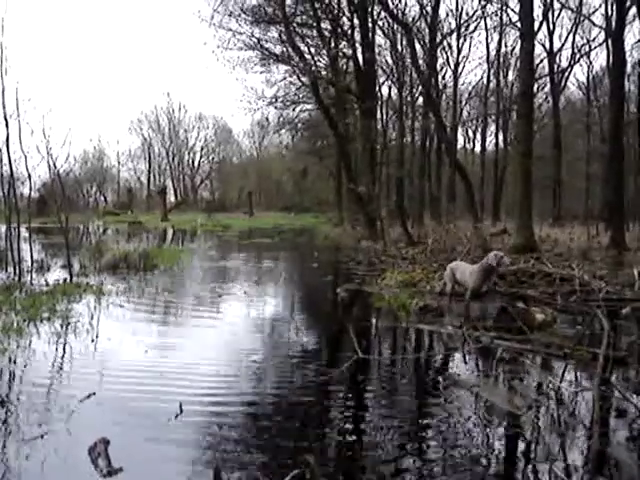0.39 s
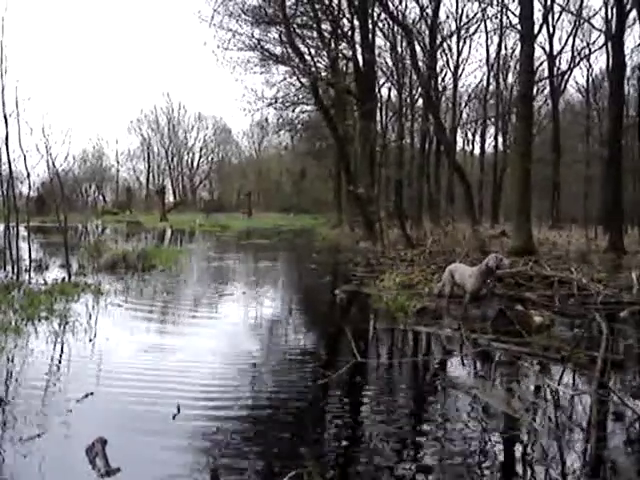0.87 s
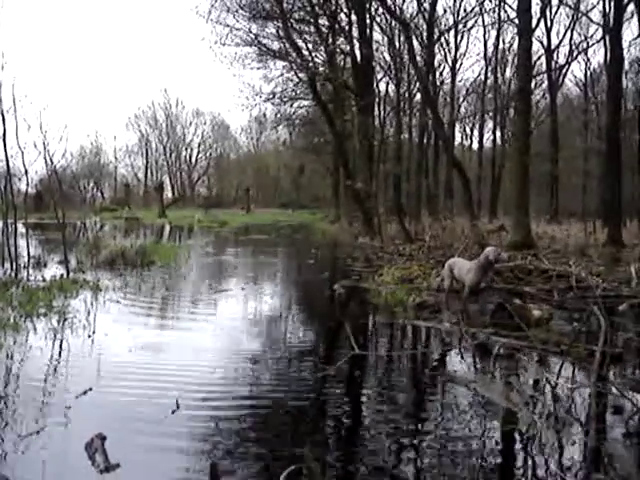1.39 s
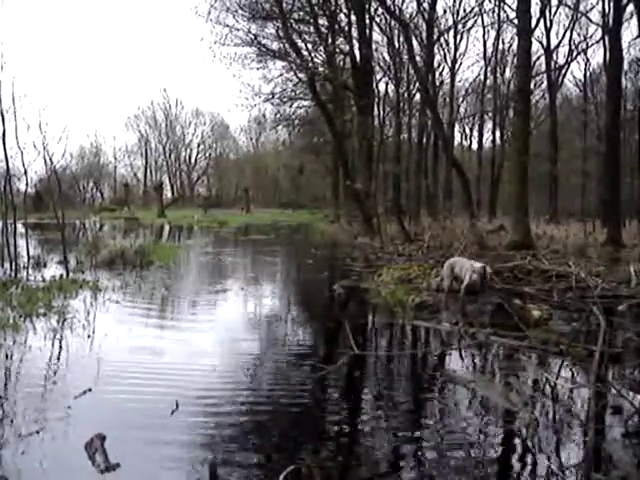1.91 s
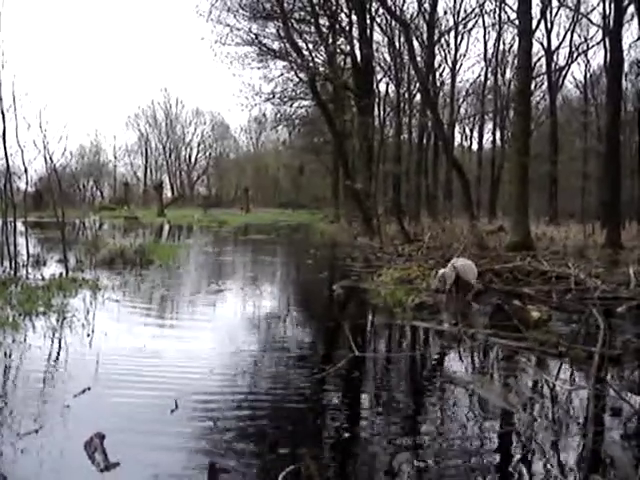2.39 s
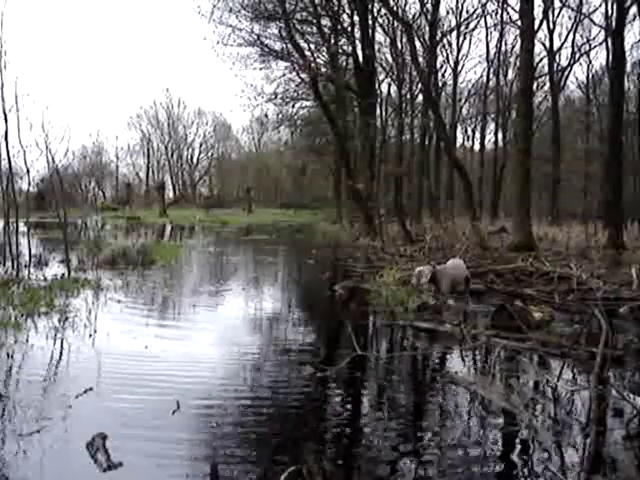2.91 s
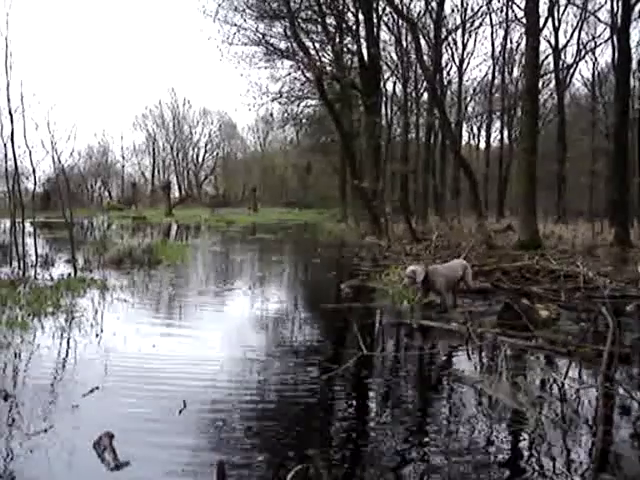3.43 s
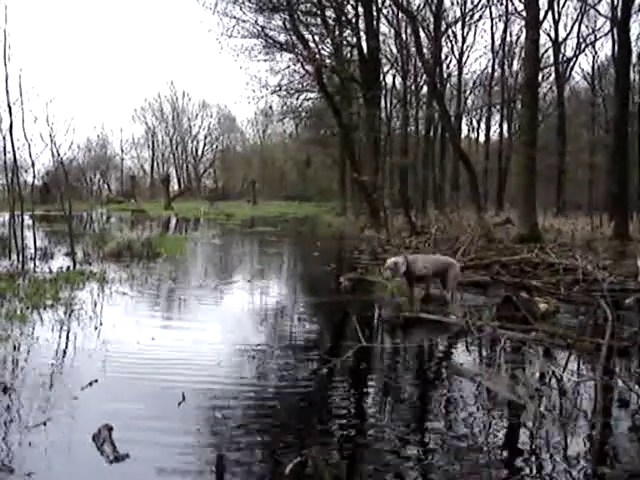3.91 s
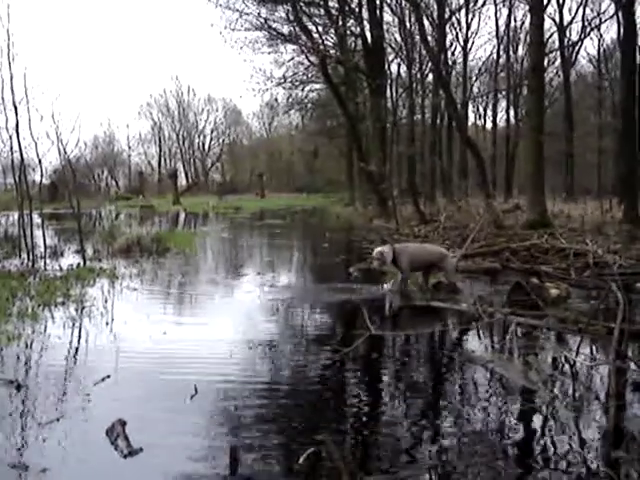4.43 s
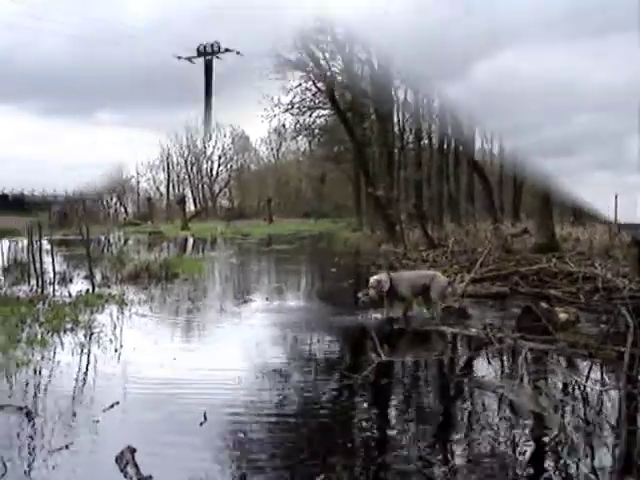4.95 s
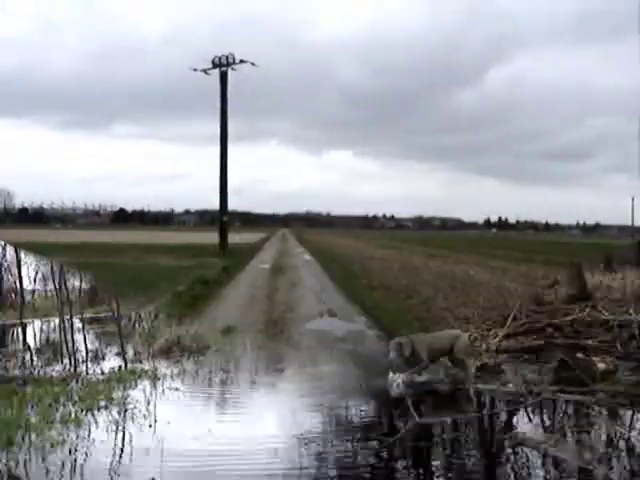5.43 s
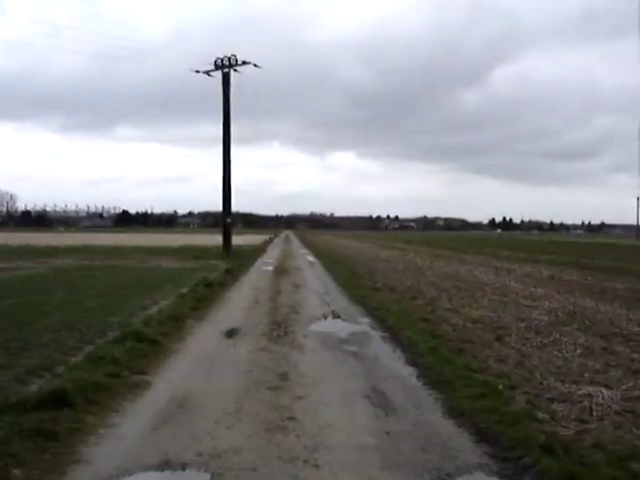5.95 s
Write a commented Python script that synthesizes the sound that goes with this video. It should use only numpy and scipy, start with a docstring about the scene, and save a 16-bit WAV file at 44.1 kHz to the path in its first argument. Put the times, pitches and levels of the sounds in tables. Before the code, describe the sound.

A quiet woodland pond with soft low air and distant traffic. A small bird repeats short high phrases with light echo among trunks. After a couple of tiny ticks and a pause, a dog steps through branches and shallow water: dry snaps, hollow knocks, bubbly plops, fizzing litter. Near the end, gusts strike the bare camera microphone, growing into heavy, distorted buffeting that buries the wood.

```python
"""A woodland pond: a dog steps through branches into the water. Twigs are noise bursts, plops are short
rising sines, the fizz is swarms of filtered specks. Birds are gliding sines, with echoes among the trunks
as a noise tail; far traffic and air in the crowns are bands of noise. Late on the wood sinks away and
gusts beat on the bare microphone as single eddies over filtered noise."""
import sys
import numpy as np
from scipy import signal
from scipy.io import wavfile
from scipy.ndimage import uniform_filter1d

SR = 44100
rng = np.random.default_rng(int(sys.argv[2]) if len(sys.argv) > 2 else 0)


def bounce(signal):
    """Save signal as a 16-bit WAV file at the path given by the first command-line argument."""
    frames = np.transpose(np.atleast_2d(signal))
    limited = np.clip(frames, -1, 1)
    pcm = np.round(limited * 32767).astype(np.int16)
    wavfile.write(sys.argv[1], SR, pcm)


def makeup_ratio(level_db):
    """Linear amplitude ratio for a level in decibels (20 dB per factor of ten)."""
    decades = np.asarray(level_db, float) / 20
    return 10 ** decades


N = 268128
T = np.arange(N) / SR
# Gain of the wood and of the steady drip as they sink away. Each row: time in seconds, gain in dB.
WOOD_FADE = [(0, -1), (4.8, -1), (5.4, 2), (5.8, -6.5), (5.95, -7.5), (6.08, -10)]


def curve(rows):
    """Columns of a table, joined by straight lines in time."""
    s, *columns = np.transpose(rows)
    return [np.interp(T, s, c) for c in columns]


def band(x, hz, octaves):
    """Two-pole-pair band-pass around hz."""
    edges = np.clip([hz * 2 ** (-octaves / 2), hz * 2 ** (octaves / 2)], 10, .45 * SR)
    return signal.sosfilt(signal.butter(2, edges, "bandpass", fs=SR, output="sos"), x)


def unit(x):
    """Scale to rms 1."""
    return x / np.sqrt(np.mean(x ** 2))


def walk(rate_hz):
    """Random levels held 1 / rate_hz seconds and slewed twice; rms near 1."""
    k = int(SR / rate_hz)
    steps = np.repeat(rng.standard_normal(N // k + 1), k)
    return unit(uniform_filter1d(uniform_filter1d(steps, k), k)[:N])


def specks(rate_hz, spread_db):
    """Random impulses of either sign, many small and a few large."""
    hits = rng.random(N) < rate_hz / SR
    sizes = makeup_ratio(spread_db * np.minimum(rng.exponential(size=N), 3))
    return hits * rng.choice([-1, 1], N) * sizes


def add(out, s, sound):
    """Mix a short sound in at time s."""
    i = max(int(s * SR), 0)
    out[i:i + len(sound)] += sound[:N - i]


def woods():
    """Far traffic and air in the crowns: half-octave noise bands that drift a little, plus a camera whine."""
    # Background spectrum. Each row: frequency in Hz, relative density in dB per Hz.
    wood_spectrum = [(20, 3.5), (48, 1.5), (100, -1.5), (350, -0.5), (600, 0.5), (890, -1), (1300, -9.5),
                     (1890, -21), (3190, -22), (4130, -16), (5500, -18), (6950, -22.5), (10000, -27)]
    level_db, whine_hz, whine_db = -44.5, 7690, -70  # rms levels ahead of the fade
    out, swell = 0, walk(1.0)
    hz_at, db_at = np.transpose(wood_spectrum)
    for hz in 28 * 2 ** np.arange(0, 8.6, .5):
        db = np.interp(np.log(hz), np.log(hz_at), db_at) + 10 * np.log10(hz)
        db = db + 0.48 * swell + 0.55 * walk(9)
        out = out + makeup_ratio(db) * unit(band(rng.standard_normal(N), hz, 0.44))
    whine = makeup_ratio(whine_db) * unit(band(rng.standard_normal(N), whine_hz, 0.02))
    return (makeup_ratio(level_db) * unit(out) + whine) * makeup_ratio(curve(WOOD_FADE)[0])


def swish(spray_share):
    """Level in dB of all leg moves over a steady drip: quick rise, hold, dripping tail."""
    # Moves of a leg through water and litter.
    # Each row: start in seconds, length in seconds, relative level in dB, spray in dB above that level.
    leg_moves = [(-.02, 0.076, -49, -15), (2.596, 0.084, -49.5, -21), (2.769, 0.077, -45.5, -8.5),
                 (2.85, .14, -44.5, -14), (3.054, 0.062, -48.5, -15), (3.232, 0.11, -50.5, -9.5),
                 (3.384, 0.019, -50.5, -5), (3.728, 0.036, -51, -5.5), (3.82, 0.13, -55, -11),
                 (3.914, .13, -45, -21), (4.1, 0.039, -45.5, -22), (4.202, 0.036, -44, -3.5),
                 (4.252, 0.23, -42, -13), (4.495, 0.27, -44.5, -9), (4.799, 0.17, -44.5, -14),
                 (5.069, 0.075, -39.5, -14), (5.211, .075, -44, -12.5), (5.479, 0.072, -48.5, -2),
                 (5.66, 0.15, -55, -9)]
    attack_s, t60_s, drip_db, drip_spray_db = .008, 0.35, -61.5, -4
    t = T[::64]
    power = makeup_ratio(2 * (drip_db + spray_share * drip_spray_db)) * makeup_ratio(2 * curve(WOOD_FADE)[0][::64])
    for s, length_s, db, spray_db in leg_moves:
        rise = np.clip((t - s) / attack_s, 0, 1)
        shape = rise * 1000. ** (-np.maximum(t - s - length_s, 0) / t60_s)
        power = power + (makeup_ratio(db + spray_share * spray_db) * shape) ** 2
    return np.interp(T, t, 10 * np.log10(power))


def stir():
    """Swarms of tiny bubbles and leaf ticks; each grain size rings its own narrow band, in patches."""
    out, shared = 0, walk(70)
    for hz in 600 * 2 ** np.arange(0, 4.1, 1 / 3):
        ticks = unit(band(specks(500, 6.1), hz, 0.33))
        grains = ticks + 0.85 * unit(band(rng.standard_normal(N), hz, 0.52))
        octaves_up = np.log2(hz / 1800)
        if hz > 1800:
            level_db = swish((octaves_up / 2.26) ** 2.5)
        else:
            level_db = swish(0) + 2.0 * octaves_up
        patches_db = 2.0 * shared + 1.63 * walk(45)
        out = out + makeup_ratio(level_db - 6.5 + patches_db) * grains
    return out


def snaps():
    """A burst of fibres tearing: a sharp noise that dies in milliseconds, coloured by the twig."""
    # Breaking twigs. Each row: start in seconds, peak in dB, brightest frequency in Hz, decay time in ms.
    twig_breaks = [(0.0389, -30.5, 2780, 4.7), (0.0633, -35, 2380, 2.5), (0.091, -38, 2060, 2.2),
                   (0.2894, -38, 3720, 2.2), (2.611, -33.5, 2160, 8.2), (2.701, -28, 3800, 4),
                   (2.8315, -35, 6300, 2.5), (2.8656, -17.5, 2740, 5.4), (2.9678, -28, 4160, 2.5),
                   (3.1974, -31.5, 2156, 4.1), (3.2097, -31.5, 3900, 6.2), (3.284, -29.5, 3260, 2),
                   (3.3358, -27.5, 3510, 6.4), (3.36, -23, 3070, 2.8), (3.3915, -16.5, 3200, 4),
                   (3.4044, -32, 3200, 2.9), (3.5313, -32.5, 4450, 2.2), (3.5508, -28, 3280, 4.6),
                   (3.777, -27.5, 2270, 5.2), (3.834, -30, 3700, 7.5), (3.8755, -27.5, 3870, 3),
                   (3.982, -32, 3260, 2.8), (4.0228, -24, 2970, 9.3), (4.0407, -25, 2940, 7.6),
                   (4.2156, -33, 2210, 2.2), (4.2632, -23, 3950, 6.3), (4.4199, -20, 2200, 3.1),
                   (4.4912, -20.5, 3700, 4.8), (4.5594, -35, 3030, 2.5), (4.8184, -25.5, 3600, 3.7),
                   (4.9163, -24, 2650, 10), (5.084, -17.5, 2990, 0.57), (5.1228, -24.5, 3100, 2.9),
                   (5.274, -25.5, 3350, 7.4), (5.5364, -39.5, 2580, 3.4)]
    out, noise = np.zeros(N), rng.standard_normal((len(twig_breaks), 1500))
    for (s, db, hz, ms), crack in zip(twig_breaks, noise):
        burst = (unit(band(crack, hz, 0.84)) + 0.51 * crack) * np.exp(-1000 * T[:1500] / ms)
        add(out, s, makeup_ratio(db) * burst / np.abs(burst).max())
    return out


def plops():
    """Each pocket of air swells fast, rings a few cycles and rises in pitch as it nears the surface."""
    # Air pockets and hollow knocks under the paws.
    # Each row: time in seconds, level in dB, pitch in Hz, length scale in ms.
    air_pockets = [(.042, -36, 1000, 5), (2.612, -29.5, 2130, 4.1), (2.813, -28, 1370, 2.4),
                   (2.822, -32, 513, 5), (2.833, -27.5, 2290, 4.4), (2.853, -27, 660, 6.3),
                   (2.871, -16, 860, 6.2), (2.936, -24.5, 508, 11), (2.95, -19, 550, 6.9),
                   (2.96, -12.5, 640, 3.3), (2.969, -18, 916, 5), (2.974, -13, 976, 1.97),
                   (3.012, -21.5, 575, 5), (3.079, -33.5, 1600, 4), (3.247, -34, 548, 8.6),
                   (3.285, -35, 496, 8.2), (3.333, -33, 2830, 2.8), (3.405, -30, 2110, 2.5),
                   (3.533, -32, 920, 5), (3.732, -35, 1630, 7.1), (3.95, -31, 1257, 10.8),
                   (3.935, -34.5, 2100, 8), (3.965, -31.5, 460, 12), (3.99, -38, 481, 25),
                   (4.023, -18.5, 450, 5.9), (4.026, -25, 1390, 5), (4.044, -27, 1550, 2.8),
                   (4.09, -38.5, 280, 22), (4.122, -33.5, 1010, 8.3), (4.134, -29, 1210, 4.6),
                   (4.208, -25, 890, 6.3), (4.224, -25, 2230, 3.4), (4.293, -32.5, 730, 3.9),
                   (4.3, -33.5, 1536, 20), (4.35, -27, 754, 6), (4.416, -17, 600, 2.7),
                   (4.422, -23.5, 1380, 4), (4.493, -31, 2560, 3.1), (4.603, -30.5, 510, 7.2),
                   (4.653, -29, 684, 6), (4.664, -32.5, 183, 12), (4.766, -30.5, 417, 3.9)]
    rise_at_500_hz = 0.078  # share of the pitch, over one length
    out = np.zeros(N)
    for s, db, hz, ms in air_pockets:
        t = T[:int(.004 * ms * SR)] * 1000 / ms  # in lengths
        shape = (1 - np.exp(-t / 0.12)) * np.exp(-(t / 1.07) ** 2)
        rise = rise_at_500_hz * (500 / hz) ** 0.68  # large pockets rise more
        phase = 2 * np.pi * np.cumsum(hz * (1 + rise * (t - .4))) / SR
        add(out, s - 0.000366 * ms, makeup_ratio(db) * shape * np.sin(phase))
    return out


def echo(x):
    """Scattered returns from the trunks: a noise tail that dies away."""
    t60_s = 1.15
    t = T[:SR]
    tail = rng.standard_normal(SR) * 1000 ** (-t / t60_s) * (1 - np.exp(-t / 0.0071))
    # moving twigs make the returns waver
    waver = makeup_ratio(2 * walk(130))
    return waver * signal.fftconvolve(x, tail / np.sqrt(np.sum(tail ** 2)))[:N]


def song_notes():
    """The songster's two phrases, each repeated with its own level and pitch factor; soft notes waver more."""
    # The two phrases. Each row: delay in seconds, length in seconds, start and held pitch in Hz before the
    # pitch factor, glide time in ms, late drift in Hz, level in dB re the phrase, echo in dB re the note.
    low_phrase = [(0, .091, 5850, 3694, 3.19, -230, 0, -8), (.108, 0.09, 3670, 4185, 37, 0, -16.5, -5)]
    high_phrase = [(0, 0.063, 6200, 4944, 6.57, 0, -3.5, 0.5), (.048, 0.049, 5050, 3346, 17, 0, -1.5, -5.5),
                   (.121, .082, 3940, 4220, 39, 0, -16, -7)]
    # When each is sung. Each row: start in seconds, level in dB, pitch factor.
    low_sung = [(.134, -44.5, 1.025), (.838, -41, 1.017), (1.543, -40.5, .999), (2.264, -41, 1.01)]
    high_sung = [(.478, -47, 1), (1.168, -43.5, 1.02), (1.89, -44.5, .99)]
    rows = []
    for phrase, sung in ((low_phrase, low_sung), (high_phrase, high_sung)):
        for s, db, tune in sung:
            for delay_s, length_s, start_hz, held_hz, ms, drift_hz, rel_db, echo_db in phrase:
                flutter_db = 3 - 0.37 * rel_db
                rows.append((s + delay_s, length_s, tune * start_hz, tune * held_hz, ms, drift_hz,
                             db + rel_db, flutter_db, echo_db))
    return rows


def far_tone_notes():
    """Thin fluttering tones deeper in the wood: brief gliding ones, and one long faint tone near 3.3 kHz."""
    # Each row: start in seconds, length in seconds, start pitch in Hz, held pitch in Hz,
    # late drift in Hz, level in dB.
    far_tones = [(.635, 0.19, 2500, 2490, -60, -59), (0.849, 0.11, 2700, 2790, -170, -61.5),
                 (1.103, .03, 5500, 4440, 0, -61), (2.265, 0.15, 8140, 8430, -330, -58.5),
                 (2.449, .1, 5450, 5320, 1, -62), (2.814, .081, 6650, 6250, -49, -45),
                 (3.135, 0.54, 3326, 3290, -20.5, -55), (3.426, .025, 8500, 8300, 6, -60),
                 (3.68, 0.041, 7100, 6800, 0, -55), (5.372, 0.1, 8730, 8530, 0, -55)]
    glide_share, flutter_db, echo_db = .18, 8.5, -8  # glide as a share of the length
    return [(s, length_s, start_hz, held_hz, 1000 * glide_share * length_s, drift_hz, db, flutter_db, echo_db)
            for s, length_s, start_hz, held_hz, drift_hz, db in far_tones]


def whistle_notes():
    """A nearer bird's short whistles, which slide down into their pitch and lift at the end."""
    # Each row: start in seconds, length in seconds, slide in Hz above the held pitch, held pitch in Hz,
    # level in dB.
    near_whistles = [(2.472, 0.032, 421.2, 4156, -35), (2.5, 0.055, 1200, 3260, -42.5),
                     (2.666, 0.033, 60, 4160, -36), (2.714, 0.051, 350, 4204, -34.5),
                     (2.955, 0.059, 250, 4270, -33.5), (3.074, .065, 380, 3943, -35),
                     (3.216, 0.02, 240, 3890, -35.5), (3.895, .014, 1000, 3750, -35)]
    glide_share, lift_hz, flutter_db, echo_db = 0.1685, 90, 2.5, -7  # glide as a share of the length
    return [(s, length_s, hz + slide_hz, hz, 1000 * glide_share * length_s, lift_hz, db, flutter_db, echo_db)
            for s, length_s, slide_hz, hz, db in near_whistles]


def birds():
    """Near-sine tones, quick to start and soft to close: what goes straight and what goes round the trunks."""
    blur_hz_per_db = 4  # pitch blur for each dB of flutter
    direct, round_about, flutter, blur = np.zeros(N), np.zeros(N), walk(220), walk(400)
    notes = song_notes() + whistle_notes() + far_tone_notes()
    for s, length_s, start_hz, held_hz, glide_ms, drift_hz, db, flutter_db, echo_db in notes:
        t = T[:int(length_s * SR)]
        here = slice(int(s * SR), int(s * SR) + len(t))
        hz = held_hz + (start_hz - held_hz) * np.exp(-1000 * t / glide_ms)
        hz = hz + drift_hz * (t / length_s) ** 4 + blur_hz_per_db * flutter_db * blur[here]
        swell = (1 - np.exp(-t / 0.0018)) * (1 - (t / length_s) ** 5)
        swell = swell * makeup_ratio(db + flutter_db * np.tanh(flutter[here]))
        note = np.sqrt(2) * swell * np.sin(2 * np.pi * np.cumsum(hz) / SR)
        add(direct, s, note)
        add(round_about, s, makeup_ratio(echo_db) * note)
    return direct, round_about


def wind():
    """Eddies push the membrane: small ones densely and at random, larger ones singly."""
    # Level of the air between the blows. Each row: time in seconds, level in dB.
    gust_levels = [(4.77, -49), (4.82, -35.5), (4.91, -29), (4.96, -26), (5.034, -24), (5.106, -21.5),
                   (5.16, -22), (5.25, -22.5), (5.35, -26.5), (5.46, -26.5), (5.576, -26.5), (5.68, -18.5),
                   (5.756, -16.5), (5.85, -19.5), (5.93, -21.5), (5.998, -28), (6.08, -21)]
    # Moments when the air lets go of the microphone. Each row: centre in seconds, length in seconds, gain in dB.
    air_lulls = [(5.06, 0.019, -5), (5.098, 0.018, -12), (5.183, 0.029, -7.5), (5.308, 0.025, -22),
                 (5.377, 0.026, -6.5), (5.517, 0.045, -8), (5.655, 0.015, -25), (5.726, 0.012, -15),
                 (5.75, 0.015, -15), (5.989, 0.028, -18), (6.026, 0.054, -14)]
    # Strongest eddies. Each row: time in seconds, level in dB, pitch in Hz.
    strong_blows = [(4.803, -23.5, 510), (4.914, -15.5, 410), (4.937, -16, 317), (5.036, -14, 503),
                    (5.082, -10.5, 318), (5.149, -8.5, 392), (5.166, -10, 404), (5.207, -17, 426),
                    (5.23, -13.5, 583), (5.261, -6.5, 400), (5.333, -15.5, 290), (5.356, -5.5, 353),
                    (5.369, -1.5, 414), (5.407, -6, 225), (5.46, -8.5, 323), (5.469, -6.5, 287),
                    (5.477, -8, 325), (5.504, -5.5, 296), (5.556, -11, 288), (5.578, -3.5, 250),
                    (5.593, -7, 302), (5.612, -12, 326), (5.672, -1.5, 290), (5.683, -12, 360),
                    (5.695, -7.5, 460), (5.711, -4, 224), (5.732, -5, 440), (5.741, -10.5, 250),
                    (5.78, -5, 240), (5.793, -4.5, 300), (5.827, -4, 211), (5.838, 3, 480),
                    (5.856, -9.5, 537), (5.873, -13, 445), (5.887, -1.5, 390), (5.905, -13, 273),
                    (5.917, -2.5, 280), (5.941, -12, 188), (5.994, -12.5, 305), (6.034, -17, 224),
                    (6.0755, -2.5, 257)]
    start_s = gust_levels[0][0]
    lull_db = sum(db * np.exp(-((T - s) / length_s * 1.78) ** 4) for s, length_s, db in air_lulls)
    air_db = curve(gust_levels)[0] + lull_db

    # middling eddies at random times
    eddy_db, scatter_db = 8, 3  # above the air level
    eddy_hz, spread_octaves, sink_octaves_per_s = 432, 0.39, .45
    times_s, chance = rng.uniform(start_s, T[-1], size=50), rng.standard_normal(size=(50, 2))
    blows = list(strong_blows)
    for s, (a, b) in zip(times_s, chance):
        octaves = spread_octaves * b - sink_octaves_per_s * (s - start_s)
        blows.append((s, air_db[int(s * SR)] + eddy_db + scatter_db * a, eddy_hz * 2 ** octaves))
    out = np.zeros(N)
    for (s, db, hz), sign in zip(blows, rng.choice([-1, 1], len(blows))):
        cycles = (T[:1536] - T[512]) * hz
        # a steep push, then the membrane swings on for a cycle or two
        shape = np.exp(-np.where(cycles < 0, (cycles / 0.42) ** 2, cycles / 0.69))
        push = shape * np.cos(2 * np.pi * cycles + 0.25)
        push = push + 0.19 * np.exp(-(cycles / 0.19) ** 2) * np.cos(2 * np.pi * 1.9 * cycles + 0.57)
        add(out, s - T[512], sign * makeup_ratio(db) * push)

    eddies = specks(900, 3.1)
    small = unit(band(band(eddies, 311, 1.94), 335, 2.1))
    small = small + makeup_ratio(-15.0) * unit(band(eddies, 105, 0.94))
    small = small + makeup_ratio(-21) * unit(band(band(specks(340, 15.0), 950, 1.52), 1100, 3.0))
    out = out + makeup_ratio(air_db + 2.2 * walk(70)) * small * (T > start_s)
    out = signal.sosfilt(signal.butter(2, 70, "highpass", fs=SR, output="sos"), out)
    # the harder the push, the more it tears into a dull crackle
    tearing = out * np.abs(out) + 0.15 * out ** 2 * unit(specks(1500, 5.0))
    return out + 0.3 * band(band(tearing, 1300, 2.2), 1300, 3)


def scene():
    """Birds far off and wet, the dog nearer and drier, wind right at the microphone."""
    song, far_song = birds()
    dog = plops() + snaps()
    tails = echo(far_song + makeup_ratio(-13.5) * dog)
    return (song + dog + tails + stir() + woods() + wind())[None]


def band_limit(x):
    """A steep low-pass at the top of the band."""
    return signal.sosfilt(signal.butter(12, 10320, fs=SR, output="sos"), x)


def record(dry):
    """The camera rounds the hardest blows and cuts everything above its narrow band."""
    top_hz, drive = 10050, 1.05
    rounded = np.tanh(drive * dry) / drive
    narrow = signal.sosfilt(signal.ellip(10, .2, 60, top_hz, fs=SR, output="sos"), rounded)
    return band_limit(narrow)


dry = scene()
out = record(dry)
bounce(out)
```